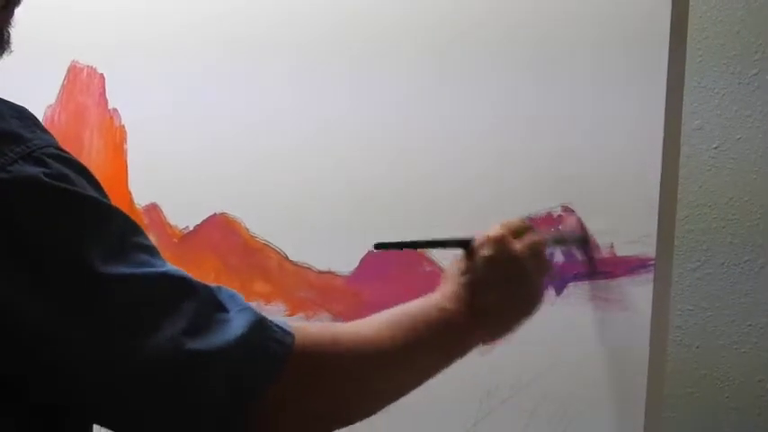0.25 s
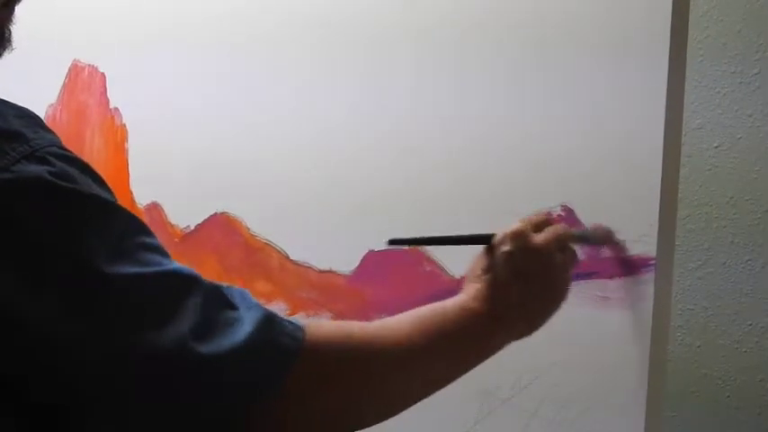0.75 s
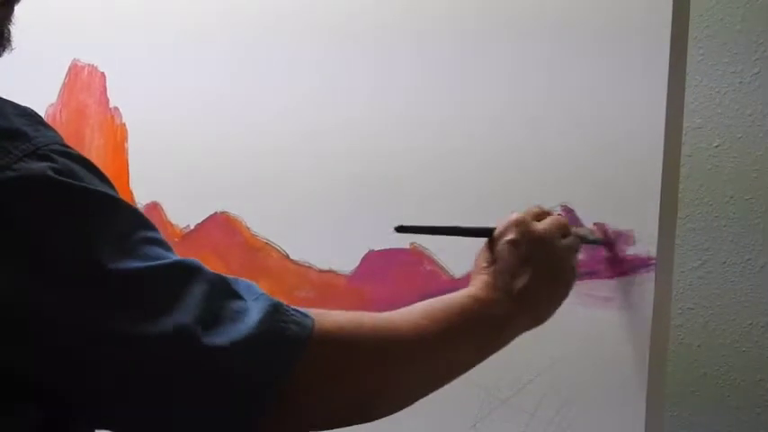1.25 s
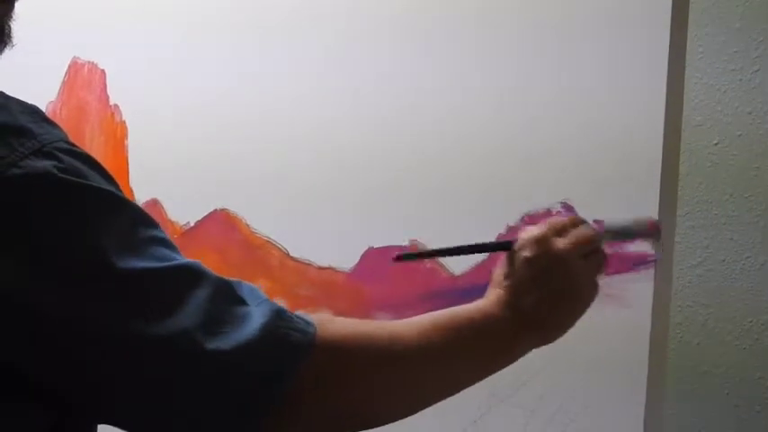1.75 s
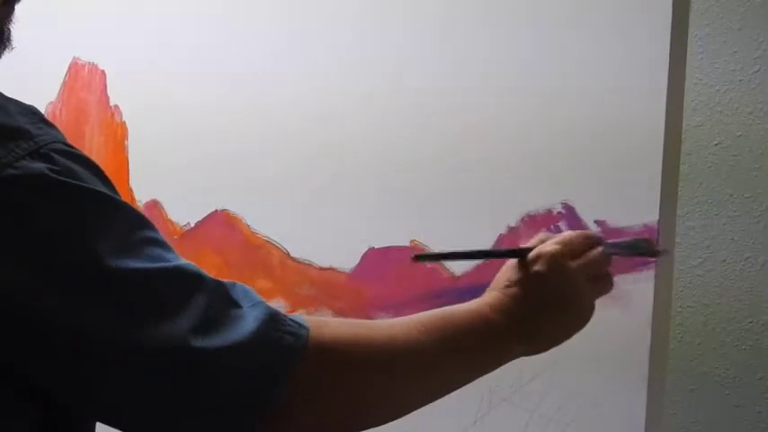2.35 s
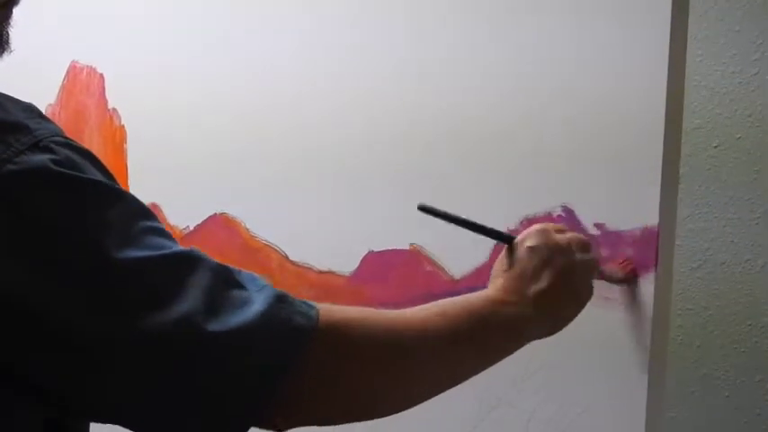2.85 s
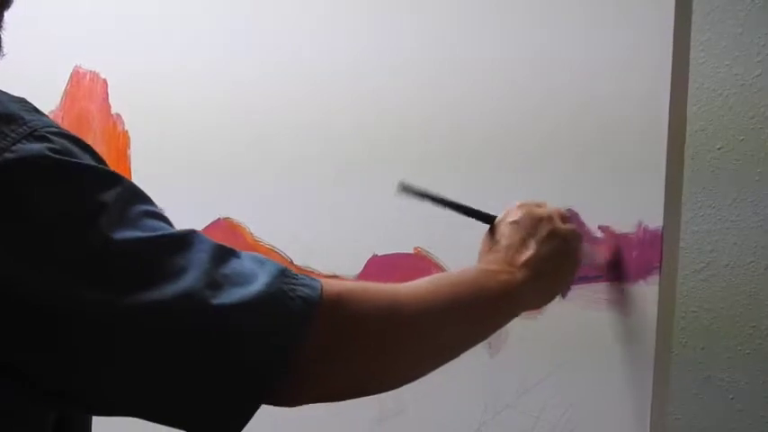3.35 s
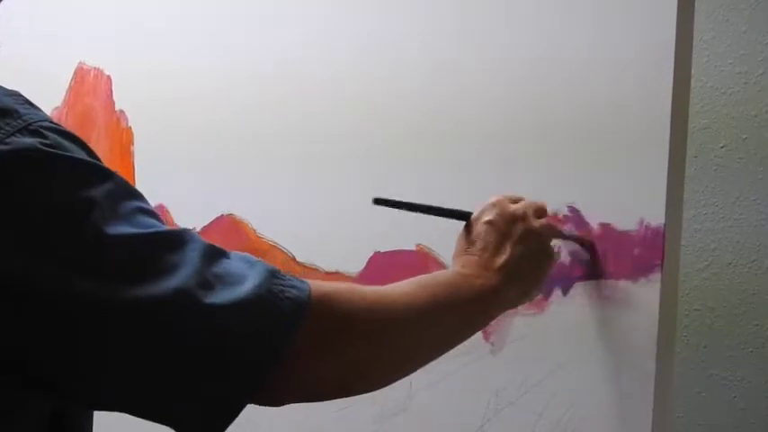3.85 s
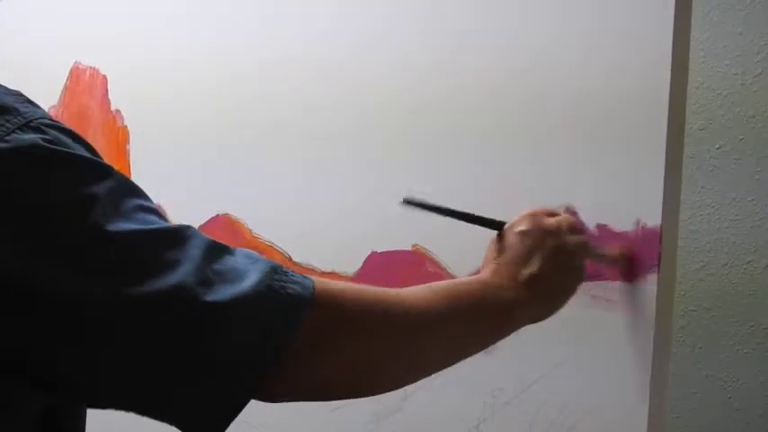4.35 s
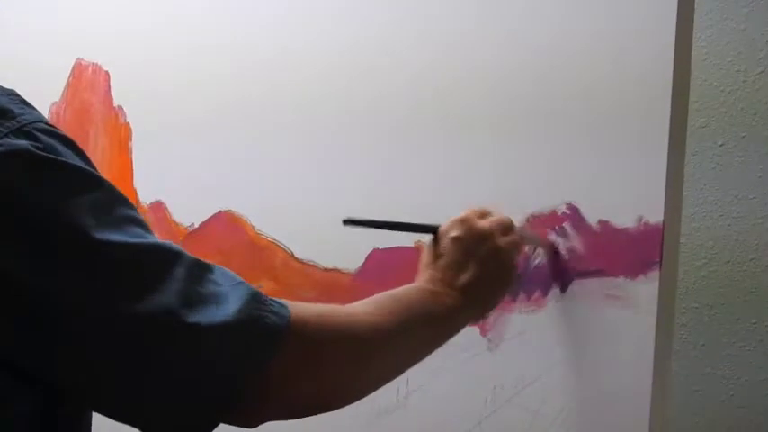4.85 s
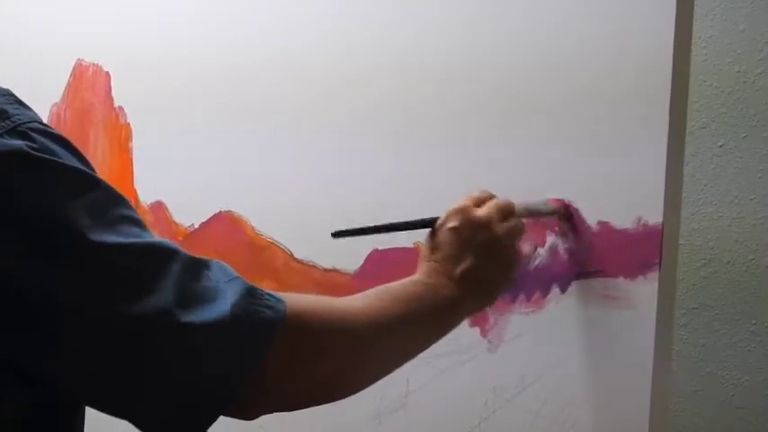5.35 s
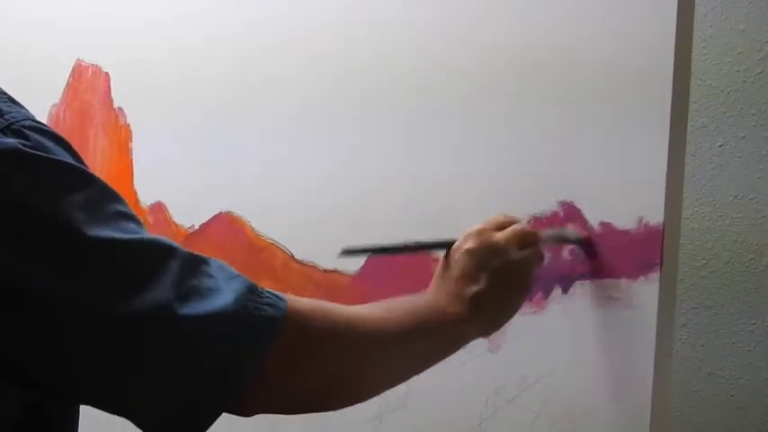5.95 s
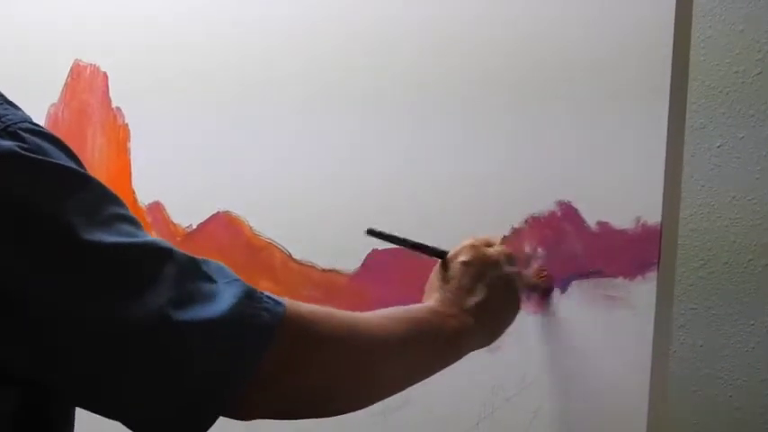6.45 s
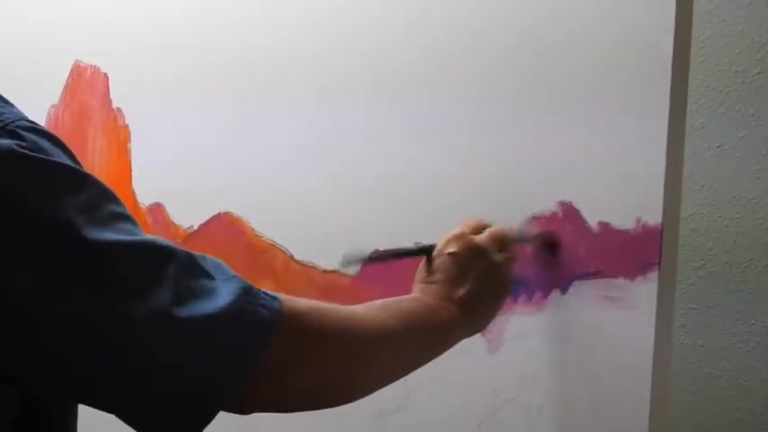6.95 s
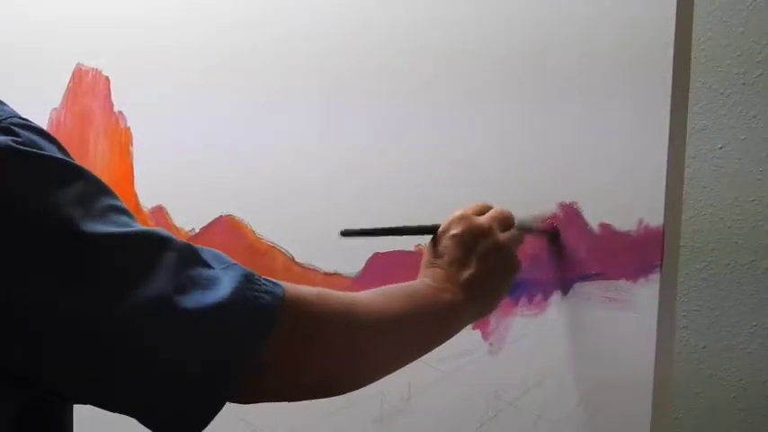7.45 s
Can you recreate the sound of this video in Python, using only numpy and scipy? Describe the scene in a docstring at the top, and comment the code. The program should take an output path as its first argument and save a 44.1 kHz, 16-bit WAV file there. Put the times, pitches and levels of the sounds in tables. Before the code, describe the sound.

Fast scratchy bristle strokes on taut canvas, sparse and soft at first, then steady and brisk, with faint drum-like thumps in a small quiet room.

```python
"""Dry brush strokes hiss back and forth from the start: a stiff paintbrush scrubs a stretched canvas.
The bristles make many tiny clicks as they slip over the threads; the cloth rasps, drones and sings a note.
Rough pushes make the cloth buzz, soft ones boom like a slack drum, and the landing brush ticks.
A close echo and the short tail of a small, quiet studio colour it all, over faint room tone."""
import sys
import numpy as np
from scipy import signal
from scipy.fft import rfft, irfft
from scipy.io import wavfile
from scipy.ndimage import uniform_filter1d, map_coordinates

SR = 44100
rng = np.random.default_rng(int(sys.argv[2]) if len(sys.argv) > 2 else 0)


def transcribe(signal):
    """Save signal, clipped to [-1, 1], as a 16-bit WAV file at the path in sys.argv[1]."""
    frames = np.atleast_2d(signal).T
    limited = np.clip(frames, -1, 1)
    pcm = np.round(limited * 32767).astype(np.int16)
    wavfile.write(sys.argv[1], SR, pcm)


N = 339570
TIME = np.arange(N) / SR
FREQ = np.maximum(np.arange(N // 2 + 1) * SR / N, 1)  # Hz

# brush strokes, before the room:
# fastest_s (fastest moment), hiss_db, length_s, rasp_db (beside the hiss)
STROKES = [(0.061, -43, 0.08, -7), (0.391, -45.5, 0.1, -6), (0.706, -47.5, 0.063, -7),
           (0.828, -63.5, 0.018, -19), (1.003, -46.5, 0.056, -13), (1.264, -73.5, 0.015, -7),
           (1.461, -44, 0.082, -5.5), (1.761, -46.5, 0.057, -11.5), (1.948, -55, 0.045, -12),
           (2.128, -40, 0.057, -6.5), (2.248, -42, 0.055, -12.5), (2.355, -47.5, 0.056, -10.5),
           (2.444, -43.5, 0.036, -8.5), (2.539, -41.5, 0.05, -4.5), (2.643, -41, 0.048, -13.5),
           (2.742, -46, 0.058, -9.5), (2.84, -47.5, 0.043, -7), (2.93, -45.5, 0.043, -7),
           (3.023, -46.5, 0.051, -5.5), (3.109, -45, 0.044, -10), (3.202, -50, 0.031, -15),
           (3.292, -49, 0.044, -8.5), (3.373, -52.0, 0.032, -12.5), (3.464, -49.5, 0.039, -11.5),
           (3.556, -49.5, 0.028, -10), (3.638, -50, 0.031, -5), (3.734, -54.5, 0.029, -8),
           (3.823, -47, 0.029, -6.5), (4.081, -34, 0.059, -11.0), (4.291, -40, 0.039, -14),
           (4.327, -39.5, 0.046, -7), (4.447, -42.5, 0.048, -4.5), (4.553, -42, 0.048, -11),
           (4.671, -40, 0.057, -4), (4.793, -43.5, 0.042, -8), (4.876, -37.5, 0.062, -4.5),
           (4.966, -51.5, 0.042, -11), (5.093, -33.5, 0.059, -9), (5.189, -58, 0.036, -6),
           (5.312, -39.5, 0.037, -13.5), (5.407, -58.5, 0.027, -7.5), (5.531, -56.5, 0.057, -8.5),
           (5.704, -44.5, 0.05, -23), (5.807, -43.5, 0.021, -28), (5.918, -36.5, 0.044, -15),
           (6.012, -36.5, 0.029, -17.5), (6.11, -29, 0.041, -6.5), (6.216, -31, 0.042, -13),
           (6.316, -26.5, 0.047, -7.5), (6.41, -30, 0.034, -12.5), (6.514, -35.5, 0.036, -10.5),
           (6.603, -34.5, 0.031, -13.5), (6.693, -27, 0.048, -8.0), (6.8, -23.5, 0.028, -13.5),
           (6.894, -31.0, 0.047, -6.5), (6.994, -29.5, 0.021, -19), (7.083, -33.5, 0.036, -4.5),
           (7.19, -29.5, 0.021, -16.5), (7.29, -56, 0.023, -2.5), (7.38, -39, 0.027, -18.0),
           (7.476, -51, 0.033, -4.5), (7.584, -54, 0.024, -23), (7.67, -65.5, 0.022, 1)]
# drum modes of the whole canvas: pitch_hz, width_hz, level_db (relative)
DRUM = [(58, 16, -30), (90.6, 7.1, -2), (122.7, 34, 12.5), (165.7, 9.4, 3.5), (218, 7, -6.5)]


def undb(db):
    """Decibels to gain."""
    return 10 ** (np.asarray(db) / 20)


def unit(x):
    """Scale to rms 1."""
    return x / np.sqrt(np.mean(x ** 2))


def colour(x, points):
    """Filter by an outline of (pitch_hz, gain_db) points, joined on a log pitch scale."""
    hz, db = np.transpose(points)
    gain = undb(np.interp(np.log(FREQ), np.log(hz), db))
    return irfft(rfft(x) * gain, N)


def resonance(hz, width_hz):
    """Frequency response of one mode, a pitch at which a thing rings; gain 1 at its centre."""
    return 1 / (1 + 1j * (FREQ ** 2 - hz ** 2) / (FREQ * width_hz))


def ringing(modes):
    """How a body with these (pitch_hz, width_hz, level_db) modes answers a single tap."""
    response = sum(undb(db) * resonance(hz, width) for hz, width, db in modes)
    return irfft(response, N)[:SR // 5]


def walk(rate):
    """Random wander around 0: straight lines between `rate` random points a second."""
    knots = rng.standard_normal(N // 8)
    return 1.03 * np.interp(TIME * rate, np.arange(len(knots)), knots)


def slips(rate, spread_db):
    """Tiny clicks of unequal size, about `rate` a second: single bristles slipping off threads."""
    hit = rng.random(N) < rate / SR
    sign = rng.choice([-1, 1], N)
    size = undb(spread_db * rng.standard_normal(N))
    return hit * sign * size / np.sqrt(rate)


def patchy(x, depth_db, rate, count):
    """The contact point moves over the cloth, so each narrow band swells and fades by itself."""
    hz, s, cells = signal.stft(x, SR, nperseg=512)
    band = np.interp(np.log(hz + 1), np.log([400, 12000]), [0, count - 1])
    chance = rng.standard_normal((count, 1024))
    wander = map_coordinates(chance, np.meshgrid(band, s * rate, indexing="ij"), order=1)
    _, uneven = signal.istft(cells * undb(1.45 * depth_db * wander), SR)
    return unit(uneven[:N])


def add(track, s, sound):
    """Mix a short sound in at time s."""
    start = max(int(s * SR), 0)
    track[start:start + len(sound)] += sound[:N - start]


def swell(levels_db, lead_s, fall_shape, rise_shape=1.9, stagger_s=0, stretch=1):
    """Loudness of all strokes: bent bristles cling, break free, speed up and trail off."""
    rise_share = .45  # part of a stroke spent speeding up
    # bristles cling until this share of the length before the fastest moment, quieter by cling_db
    cling_share, cling_db, let_go_s = 0.39, -7, 0.00299
    power = np.zeros(N)
    leads = lead_s + stagger_s * rng.standard_normal(len(STROKES))
    for (s, _, length, _), db, lead in zip(STROKES, levels_db, leads):
        near = slice(max(int((s - .25) * SR), 0), int((s + .25) * SR))
        u = (TIME[near] - s + lead) / (length * stretch)  # 0 at the loudest moment
        rise = np.abs(u / rise_share) ** rise_shape
        fall = np.abs(u / (1 - rise_share)) ** fall_shape
        slope = np.where(u < 0, rise, fall)
        clinging = .5 - .5 * np.tanh((u + cling_share) * length / let_go_s)
        power[near] += (undb(db + cling_db * clinging) * np.exp(-slope)) ** 2
    return np.sqrt(power)


def slack():
    """Cloth slack in the middle moves more than cloth taut near the frame: gain for its own sounds."""
    # freedom of the spot under the brush to vibrate: time_s, gain_db
    freedom = [(0, -1.5), (1.05, 5), (1.5, -11), (2.2, 4), (2.75, -7), (3.05, 5.5), (3.7, -2),
               (4.25, -11.5), (4.8, -1.5), (5.6, 2), (6.4, 0), (7.7, 4)]
    return undb(np.interp(TIME, *np.transpose(freedom)))


def scrubbing(fizz_db=-13, fizz_growth=1.377, ragged_db=2.5):
    """Bristles hiss, brightest at full speed; the cloth rasps and drones slightly earlier, as they bite."""
    # colours of the four layers, relative: pitch_hz, gain_db
    hiss_colour = [(2500, -30), (3700, -23), (4800, -8), (5800, 1), (6500, 4), (7300, -5.5), (8300, -16.5),
                   (9500, -36), (12200, -54), (15000, -76)]
    fizz_colour = [(4000, -12), (6500, -11.5), (7600, 3), (9000, -2.5), (10500, -13.5), (12500, -27.5),
                   (15000, -43)]
    rasp_colour = [(700, -53), (1150, -9.5), (1550, 1.5), (2300, 1), (3000, -0.5), (3800, 0), (5000, 3.5),
                   (8000, -28), (15000, -63)]
    drone_colour = [(100, -35), (300, -25), (450, -12), (600, -8), (730, -1.5), (880, 0), (1100, -11),
                    (1300, -13), (1800, -31), (12000, -75)]
    _, hiss_db, _, rasp_db = np.transpose(STROKES)
    force_db = hiss_db - np.median(hiss_db)

    # bristle tips graze the cloth before and after each stroke; harder strokes graze a little louder
    graze = swell(-63 + .2 * force_db, lead_s=0, fall_shape=5.1, stretch=2.42)
    ragged_graze = graze * undb(ragged_db * walk(45))
    speed = np.hypot(swell(hiss_db, lead_s=0, fall_shape=1.3), ragged_graze)
    relative_speed = speed / speed.max()
    rate = 2500 + 24000 * np.sqrt(relative_speed)  # a faster brush crosses more threads

    # bristles catch and let go in bunches
    tufts = undb(1.2 * walk(350) + 1.1 * walk(80))
    hiss = patchy(colour(slips(rate, spread_db=2.5), hiss_colour), depth_db=2, rate=40, count=44)
    fizz = patchy(colour(slips(rate / 2, spread_db=4.5), fizz_colour), depth_db=2.5, rate=42, count=40)
    rasp = patchy(colour(slips(rate / 2, spread_db=3.0), rasp_colour), depth_db=4.5, rate=35, count=40)
    drone = patchy(colour(slips(rate / 2, spread_db=0.5), drone_colour), depth_db=4.5, rate=26, count=14)

    fizz_level = undb(fizz_db) * speed.max() * relative_speed ** fizz_growth
    # stagger_s scatters the moment at which the cloth catches
    rasp_level = swell(hiss_db + rasp_db, lead_s=0.0022, fall_shape=1.8, stagger_s=.004, stretch=1.095)
    drone_db = rasp_db - 9 + 0.048 * force_db  # below the rasp, less so in hard strokes
    drone_level = swell(hiss_db + drone_db, lead_s=0.0037, fall_shape=1.64, stagger_s=.003, stretch=1.14)
    bristles = speed * hiss + fizz_level * fizz
    cloth = rasp_level * rasp + slack() * drone_level * drone
    return undb(0.5) * tufts * (bristles + cloth)


def weave(smear_hz=110, lead_s=0.00304):
    """Threads crossing the bristles sing a coarse note that rises and falls with each stroke."""
    top_hz, pitch_growth, note_db = 1321, .2, -12.5  # at top speed; power law; beside the rasp
    _, hiss_db, _, rasp_db = np.transpose(STROKES)
    speed = swell(hiss_db, lead_s=lead_s, fall_shape=1.7) + undb(-70)
    hz = top_hz * (speed / speed.max()) ** pitch_growth
    turn = 2 * np.pi * np.cumsum(hz) / SR
    # random weights blur the pitch
    note = unit(walk(2 * smear_hz) * np.cos(turn) + walk(2 * smear_hz) * np.sin(turn))
    level = swell(hiss_db + rasp_db + note_db, lead_s=lead_s, fall_shape=1.07, stretch=1.16)
    return note * slack() * level


def rumble(db=-27, lag_s=0.017):
    """Hard scrubbing keeps the whole canvas trembling, slightly behind the strokes."""
    tremble = unit(signal.fftconvolve(rng.standard_normal(N), ringing(DRUM))[:N])
    effort = swell(np.transpose(STROKES)[1], lead_s=-lag_s, fall_shape=0.46)
    return undb(db) * slack() * tremble * effort * np.sqrt(effort / effort.max())


def drag(trim_db=-6):
    """Bristles dragging lightly on the cloth make a faint, crackly rustle that comes and goes."""
    # level before the trim and the random wander: time_s, level_db
    drag_levels = [(0, -78), (1.85, -74.5), (2.3, -50.5), (2.75, -79), (3.1, -57), (3.3, -67.5), (4.0, -76),
                   (4.65, -73), (4.9, -59), (5.55, -57.5), (5.8, -67), (7.7, -66)]
    # colour of the rustle, relative: pitch_hz, gain_db
    rustle_colour = [(60, -35), (165, -17), (280, -29), (540, -11), (650, -7), (740, -1), (870, -.5),
                     (1150, -20), (1600, -15), (2250, -10), (3000, -23), (4600, -19), (9000, -44),
                     (15000, -62)]
    grip_db = 3 * walk(30)
    crackle = slips(1600, spread_db=4)
    rustle = patchy(colour(crackle, rustle_colour), depth_db=2.5, rate=16, count=24)
    level_db = np.interp(TIME, *np.transpose(drag_levels))
    return undb(level_db + grip_db + trim_db) * rustle


def room_tone(db=-82):
    """The still air of the studio: coloured noise, its level slowly wandering in decibels."""
    # colour of the air, relative: pitch_hz, gain_db
    air_colour = [(25, -37), (70, 2.5), (160, 6.5), (300, 1), (750, 0), (1200, -22), (2000, -13),
                  (4000, -8.5), (6300, -23), (9000, -14.5), (15000, -27)]
    mid, side = (unit(colour(rng.standard_normal(N), air_colour)) for _ in range(2))
    return undb(db + walk(1.7)) * np.array([mid + 0.1 * side, mid - 1.3 * side])


def judders(jitter=0.19, sharpness=0.17):
    """The pressed brush sticks and slips; its uneven, gliding pushes ring the cloth around it."""
    # buzzes, loudest moment before the room: middle_s, level_db, pitch_hz (at the middle),
    # half_length_s, glide (fall of log pitch per half length)
    buzzes = [(0.049, -44.5, 174.7, .013, .1), (0.066, -49, 483.7, .03, .15), (0.407, -45.5, 449, .03, .1),
              (1.038, -54, 402.5, .028, .45), (1.97, -59, 778, .018, .02), (2.623, -57.5, 958, .018, -.25),
              (3.012, -45, 747.6, .018, .06), (3.42, -65.5, 148, .026, 0.15),
              (5.054, -48.5, 122.3, .02, .15), (5.082, -46.5, 828, .012, .1), (5.183, -54, 831, .017, .15),
              (6.298, -45, 389, .016, .15), (6.516, -40, 429.3, .02, .5), (6.931, -41.5, 425.2, .02, .45),
              (7.015, -45.5, 197.7, .022, .05), (7.122, -33.5, 602.5, .01, .6),
              (7.159, -38.5, 341.3, .026, .02)]
    # modes of the cloth around the brush: pitch_hz, width_hz, level_db (relative)
    canvas_modes = [(166, 30, 5.5), (193, 94, -10), (327, 59, 3), (439.3, 24, 2.5), (544, 27, 5),
                    (724, 48, 9), (1220, 280, -9)]
    body = ringing(canvas_modes)
    out = np.zeros(N)
    for s, db, hz, half, glide in buzzes:
        u = np.arange(-2 * half, 2 * half, 1 / SR) / half
        size, stretch = rng.standard_normal((2, 256))
        cycles = np.cumsum(hz * np.exp(-glide * u)) / SR
        cycles = cycles + jitter * np.interp(cycles, np.arange(len(stretch)), stretch)
        pressure = np.interp(cycles, np.arange(len(size)), undb(6.3 * size))
        slip = np.gradient(np.exp(sharpness * np.cos(2 * np.pi * cycles)))
        push = slip * pressure * np.exp(-u ** 2)
        buzz = signal.fftconvolve(push, body)
        loudest = np.sqrt(uniform_filter1d(buzz ** 2, size=660).max())  # rms over 15 ms
        add(out, s - 2 * half, buzz / loudest * undb(db))
    return out


def thumps(spot_db=2.0):
    """A soft push rings the canvas like a slack drum; each spot favours other modes."""
    # bumps as the brush lands or turns, before the room: start_s, peak_db, push_s (length of the push)
    bumps = [(0.1, -49, 0.0047), (0.29, -45.5, 0.0031), (0.624, -45.5, 0.0019), (0.915, -44, 0.0055),
             (1.058, -40, .0024), (1.084, -40.5, 0.0034), (2.072, -48.5, 0.0037), (2.092, -53, 0.0037),
             (2.228, -55, 0.005), (3.406, -60, 0.0095), (5.041, -56, 0.01), (5.795, -47, 0.0017),
             (5.991, -47, 0.0027), (6.133, -36, 0.0059), (6.336, -39.5, 0.0076), (6.43, -43, 0.0068),
             (6.493, -31, 0.0051), (6.582, -44, 0.0053), (6.72, -42, 0.0076), (6.973, -34.5, .0058),
             (7.118, -33.5, 0.0025), (7.226, -48, 0.0043), (7.361, -49, 0.0032)]
    out = np.zeros(N)
    age = TIME[:SR // 4]
    hz, width, mode_db = np.transpose(DRUM)
    fade = np.exp(-np.pi * width[:, None] * age)
    modes = fade * np.cos(2 * np.pi * hz[:, None] * age)
    for s, db, length in bumps:
        push = np.sin(np.pi * np.minimum(age / length, 1)) ** 2
        spot_gains = undb(mode_db + spot_db * rng.standard_normal(len(hz)))
        boom = signal.fftconvolve(push, spot_gains @ modes)
        add(out, s, boom / np.abs(boom).max() * undb(db))
    return out


def ticks():
    """Each landing rings briefly in the brush and the cloth: a narrow band of noise that dies away."""
    # landings: start_s, level_db (before the fades and the room), pitch_hz, t60_s (time to fall 60 dB)
    landings = [(.279, -50.5, 766, 0.13), (.622, -56.5, 1750, 0.08), (1.684, -48, 1890, 0.13),
                (1.901, -48, 2910, 0.24), (1.904, -52, 1980, 0.13), (2.035, -49.5, 6030, 0.15),
                (2.427, -46, 1800, 0.057), (5.029, -49.5, 636, 0.1), (5.888, -43.5, 6650, 0.066)]
    out = np.zeros(N)
    age = TIME[:SR // 4]
    for s, db, hz, t60 in landings:
        # a higher tick rings over a wider band; squaring applies the resonance twice
        band = resonance(hz, 130 + .11 * hz) ** 2
        ring = unit(irfft(rfft(rng.standard_normal(N)) * band, N))[:len(age)]
        fade = np.exp(-np.log(1000) * age / t60)
        onset = 1 - np.exp(-age / 0.001)
        add(out, s, undb(db) * ring * fade * onset)
    return out


def studio(x, echo_s=0.0048, echo_db=-11, wet_db=-10, t60=0.16, gap_s=0.0015):
    """A close surface repeats the sound; a short tail, changing as the arm moves, spreads the treble."""
    # side of the tail beside its middle: pitch_hz, gain_db
    tail_width = [(100, -16), (500, -0.5), (2000, -4.5), (5000, 1.5), (12000, 9.5)]
    # colour of the tail: fuller bass, a dip near 800 Hz, a lift near 2 kHz: pitch_hz, gain_db
    wall_colour = [(200, 4.5), (800, -4), (2000, 5), (6500, -2), (9000, -2.5), (14000, -1)]
    echo = undb(echo_db) * np.exp(-2j * np.pi * FREQ * echo_s)
    # the echo repeats itself, ever weaker; the square root evens out the added energy
    direct = irfft(rfft(x) * np.sqrt(1 - undb(2 * echo_db)) / (1 - echo), N)
    decay = np.exp(-np.log(1000) * TIME / t60) * (TIME > gap_s)
    tail_level = decay / np.sqrt(np.sum(decay ** 2)) * undb(wet_db)
    angle = 1.31 * walk(6)  # blends two different tails
    out = 0.95 * np.array([direct, direct])
    for share in (np.cos(angle), np.sin(angle)):
        mid, side = rng.standard_normal((2, N)) * tail_level
        tail = colour(mid + np.array([[1], [-1]]) * colour(side, tail_width), wall_colour)
        out = out + signal.fftconvolve((share * direct)[None], tail[:, :SR // 2], axes=1)[:, :N]
    return out


def scene(pan_db=-.5):
    """All brush sounds, a little right of centre, in the room."""
    brush = scrubbing() + weave() + rumble() + drag() + judders() + thumps() + ticks()
    balance = undb(np.array([[pan_db], [-pan_db]]) / 2)  # left, right
    return studio(brush) * balance + room_tone()


def record(dry):
    """The microphone thins the deep bass below 52 Hz; the recorder cuts the top above 14.7 kHz."""
    thin = signal.sosfilt(signal.butter(3, 52, "highpass", fs=SR, output="sos"), dry)
    return signal.sosfilt(signal.ellip(8, .2, 70, 14700, fs=SR, output="sos"), thin)


dry = scene()
out = record(dry)
transcribe(out)
```